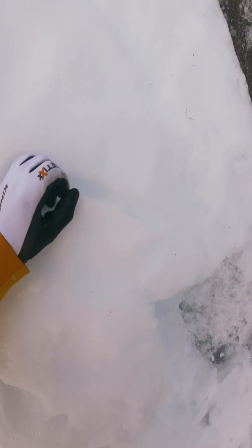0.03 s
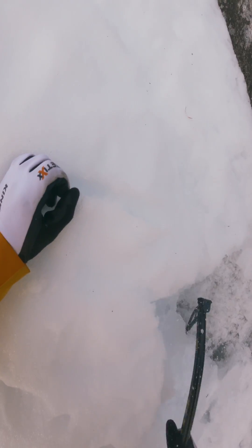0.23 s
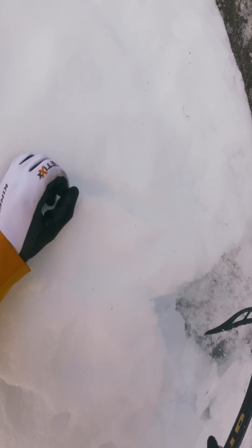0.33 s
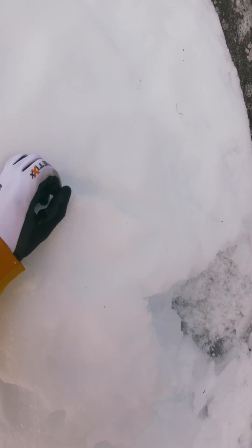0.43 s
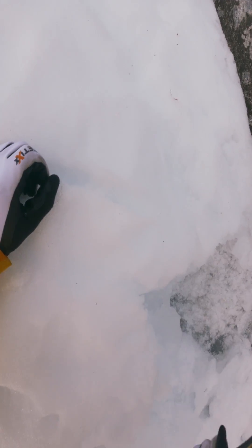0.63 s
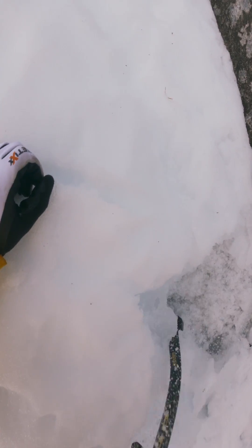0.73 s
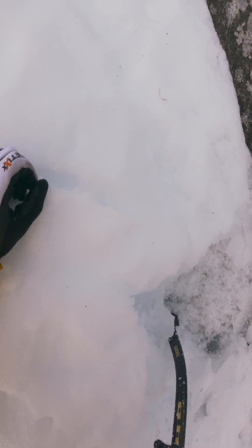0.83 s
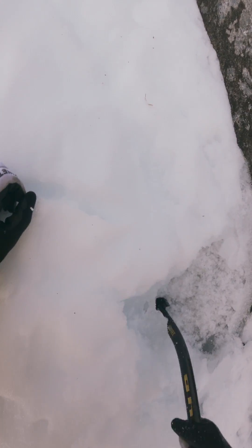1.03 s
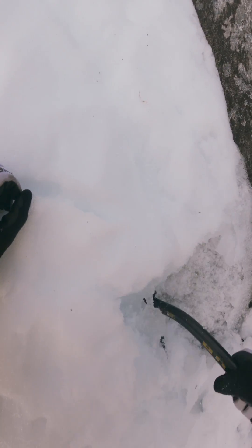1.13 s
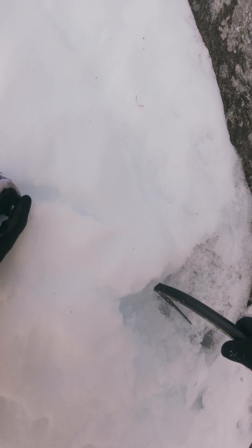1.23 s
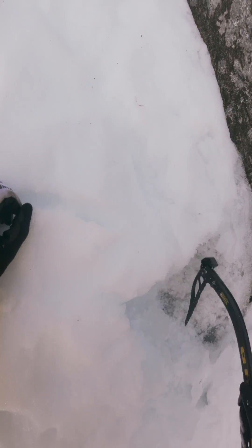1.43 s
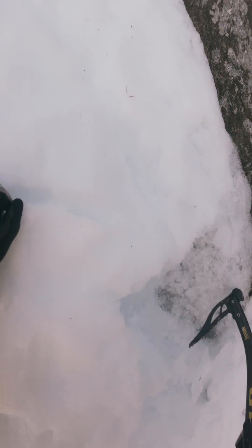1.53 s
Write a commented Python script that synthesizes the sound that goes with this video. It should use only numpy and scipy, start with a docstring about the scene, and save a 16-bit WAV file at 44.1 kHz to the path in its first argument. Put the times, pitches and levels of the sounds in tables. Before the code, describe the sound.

An ice axe hits hard snow twice, each blow a sharp crack with a dull thump. The pick crunches loose, squeaks once and rings faintly coming free. It is close by, in open mountain air with a faint hiss.

```python
"""Soft hiss and light gusts in open mountain air, no echo. A faint hiss swells, then at 0.2 s and 0.77 s
an ice axe is swung into hard snow at arm's length: each blow cracks the crust and thumps the packed snow.
The pick is then levered loose, crushing grains as it moves, and squeaks once near 1.17 s as steel slips
on ice. From 1.26 s it is dragged out of its hole and rings faintly as it comes free."""
import sys
import numpy as np
from scipy import signal
from scipy.fft import rfft, irfft
from scipy.io import wavfile
from scipy.ndimage import uniform_filter1d

SR = 44100
rng = np.random.default_rng(int(sys.argv[2]) if len(sys.argv) > 2 else 0)


def to_wav(sig):
    """Store sig (one row per channel, or 1-D mono) as 16-bit WAV at the path in sys.argv[1].

    Samples outside -1..1 are clipped; the rate is SR.
    """
    pcm = np.clip(np.atleast_2d(sig), -1, 1) * 32767
    pcm = np.round(pcm).astype(np.int16)
    wavfile.write(sys.argv[1], SR, pcm.T)  # frames by channels


N = 70560

# Spectra of slope hiss and of gusts. Each row: frequency in Hz, relative level in dB.
HISS_SPECTRUM = [(35, -50), (60, -27), (172, -6.5), (244, -9.5), (330, -3.5), (682, -19), (767, -12),
                 (1110, -9.5), (1740, -14.5), (12400, -25.5), (16000, -47)]
GUST_SPECTRUM = [(20, -12.5), (45, 7), (70, -5.5), (110, -4.5), (200, -9), (500, -46.5)]
# Their levels over time. Each row: time in seconds, level in dB.
HISS_LEVELS = [(0, -48), (.15, -50.5), (.42, -49), (.55, -52), (.59, -53.5), (.72, -50.5), (1.55, -49)]
GUST_LEVELS = [(0, -35), (.05, -50.5), (.17, -47), (.45, -60), (.555, -49), (.68, -57.5), (1.5, -56.5),
               (1.6, -49)]

# The first row is a faint hiss swelling just before the first blow; the rest are the pick crushing snow.
# Each row: start in seconds, length in seconds, grit level in dB, grit tilt in dB per octave,
# crunch level in dB, rumble level in dB, swell over the length in dB.
GRAIN_SPANS = [(0.188, 0.02, -39.5, -1, -48, -48, 9), (0.215, 0.012, -24, -3.5, -25.5, -19.5, 0),
               (0.226, 0.012, -28.5, 1.5, -23.5, -21.5, 7.5), (0.253, 0.012, -43, 2, -31, -26.5, -5),
               (0.277, 0.021, -48, 2, -43, -51, 8), (0.297, 0.015, -30.5, -4.5, -36, -63, 5),
               (0.321, 0.039, -43.5, 3.5, -46, -53, -9), (0.749, 0.017, -31, 1, -44, -43, 16),
               (0.8, 0.024, -42, 1, -43.5, -51, 1), (0.826, 0.025, -31, -8.5, -38, -31.5, 7),
               (0.855, 0.022, -30.5, -5.5, -51, -29, -3.5), (0.885, 0.04, -34, -1.5, -32.5, -59, 6.5),
               (0.934, 0.034, -42, -6.5, -41, -69, 1), (0.973, 0.026, -39.5, -2.5, -33, -44, -2.5),
               (1.003, 0.058, -31.5, -1.5, -25.5, -40, -6.5), (1.054, 0.035, -29, -3, -26, -27, 4.5),
               (1.091, 0.031, -26.5, -0.5, -21.5, -25, 4.5), (1.123, .04, -32, 1.5, -41, -46, -0.5),
               (1.165, 0.017, -27.5, -5.5, -30, -31.5, 5), (1.185, 0.02, -35, 2.5, -41, -34, -1),
               (1.207, 0.034, -33.5, 2, -41.5, -38, -2.5), (1.282, 0.023, -34.5, -1.5, -39, -61, -5),
               (1.309, 0.035, -39.5, 1, -36, -47, 9.5), (1.358, 0.087, -41, -3, -42, -57, -10.5),
               (1.419, 0.032, -37.5, -7.5, -38, -40, -1), (1.451, 0.059, -40, -0.5, -47.5, -50.5, 0)]
# Spectra of the grain layers. Each row: frequency in Hz, relative level in dB.
GRIT_SPECTRUM = [(400, -25), (1000, 3.5), (1600, -6), (2300, 3), (2600, -0.5), (3800, 4.5), (4250, 0.5),
                 (4700, -1), (6100, -1), (7600, -3), (8500, -13), (10800, -14.5), (12200, -12),
                 (15500, -48)]
CRUNCH_SPECTRUM = [(100, -0.5), (250, -6.5), (390, 5), (500, 2.5), (700, 2), (950, -3.5), (1300, -29),
                   (2500, -67)]
RUMBLE_SPECTRUM = [(20, -33), (50, -16), (80, 2.5), (140, -2.5), (260, -10), (450, -49), (1200, -64)]
# Resonances of the hollow around the pick, and of the axe damped by the snow that grips it.
# Each row: frequency in Hz, width in Hz, relative level in dB.
HOLLOW_MODES = [(281, 26, 0), (382, 7.8, -6), (403.8, 6.7, 10.5), (556, 30, -6.5), (646, 53, -11),
                (764, 17, -2.5), (915, 46, -1)]
GRIPPED_MODES = [(2320, 120, -7.5), (2990, 240, -7), (3416, 68, -2), (3873, 73, 1), (4210, 90, 3.5),
                 (5284, 130, -4), (6056, 210, 1.5), (6830, 160, -6.5), (7420, 160, -5.5)]

# Crust cracking. Each row: start in seconds, level in dB, decay in seconds, tilt in dB per octave.
CRACKS = [(0.2082, -10.5, 0.0039, 0), (0.2418, -16.5, 0.0038, -4), (0.7696, -9.5, 0.005, 2.5),
          (0.9987, -16, 0.0018, 2.5), (1.2546, -24, 0.0037, -2.5), (1.3347, -20, 0.0031, 5.5),
          (1.391, -22, .002, 5.5)]
# Spectra of the fracture and of the tip meeting ice. Each row: frequency in Hz, relative level in dB.
FRACTURE_SPECTRUM = [(150, -10), (500, -1), (1500, -0.5), (2700, -5.5), (4100, -1.5), (5100, -0.5),
                     (6150, -0.5), (6700, 1.5), (7500, -2), (8300, -7.5), (10500, -28), (12200, -13.5),
                     (15500, -55)]
TIP_SPECTRUM = [(2000, 3.5), (5000, 0), (8000, -8), (12300, -7), (16000, -31)]
# Packed snow thumping. Each row: start in seconds, level in dB, pitch in Hz, decay in seconds.
THUMPS = [(0.2101, -9.5, 370, 0.0029), (.2226, -4.5, 230, .006), (.2346, -3.5, 235, .0075),
          (.7738, -6, 160, .007), (.7822, -18, 235, .007), (.2435, -12, 670, 0.0043),
          (0.2615, -22, 463, 0.0035), (0.272, -27, 89, 0.0091), (.3128, -13.5, 643, 0.002),
          (0.7934, -16, 96, 0.008), (0.868, -32, 109, 0.011), (0.925, -29.5, 102, 0.011),
          (1.184, -25, 124, 0.0066), (1.216, -22, 158, 0.0061), (1.2578, -15, 700, 0.002),
          (1.2574, -23.5, 286, 0.0051), (1.263, -20.5, 104, 0.0065)]

# Pulses of the squeak. Each row: start in seconds, level in dB, decay in seconds.
SQUEAK_PULSES = [(1.167, -14.5, 0.0079), (1.175, -23.5, 0.011), (1.194, -20, 0.0055)]
# Resonances of the squeak and of the freed pick.
# Each row: frequency in Hz, width in Hz, relative level in dB.
SQUEAK_MODES = [(2050, 180, -11), (3100, 350, -4), (3570, 260, 47), (3870, 350, 0), (4150, 250, -4),
                (5700, 400, -13), (6200, 250, -13)]
FREE_MODES = [(2314, 27, -1), (3100, 65, -8.5), (3266, 67, -7), (4130, 26, -4.5), (5670, 250, -8),
              (6600, 190, -12), (7430, 390, -11)]
# Freed pick ringing. Each row: start in seconds, level in dB, decay in seconds, tilt in dB per octave.
RINGS = [(1.259, -37.5, 0.072, -4), (1.286, -35, 0.02, -18), (1.311, -30, 0.025, -9), (1.366, -42, 0.12, 1),
         (1.418, -35.5, .04, -2.5), (1.478, -30, 0.018, -8.5)]

# Stereo width of air and axe. Each row: frequency in Hz, side gain in dB.
AIR_SIDE = [(30, -1), (120, -19), (400, -12), (1000, -5.5), (4000, -3), (12000, -3)]
AXE_SIDE = [(60, -50), (250, -20.5), (500, -20.5), (1200, -8.5), (4000, -10), (9000, -8), (14000, -2.5)]
# Leftward lean of the axe. Each row: frequency in Hz, left minus right in dB.
AXE_BALANCE = [(200, 0.5), (500, 1), (1200, 3), (2500, 6), (5000, 2), (9000, 5.5)]

AIR_WAVER_PER_S, AIR_WAVER_DB = 41.9, 1.5
LOOSE_SNOW_PER_S, LOOSE_SNOW_DB = 98, -60
GRIT_PER_S, CRUNCH_PER_S, GRAIN_SPREAD_DB = 5000, 2200, 3
CRYSTALS_PER_S, CRYSTAL_DB = 150, 7.5
SPAN_ATTACK_S, SPAN_RELEASE_S = 0.0054, 0.0058
JERK_PER_S, JERK_DB = 200, 0.8
HOLLOW_DB, GRIT_RING_DB, CRACK_RING_DB = -3.5, -9.5, -5  # against the direct sound
TIP_DB, TIP_DECAY_S, CRACK_SIDE_DB = -8, 0.0017, -3.5
SLIP_HZ, SLIP_JITTER, SLIP_SPREAD_DB = 894, 0.3, 5
TIME_S = np.arange(N) / SR
FREQ_HZ = np.arange(N // 2 + 1) * SR / N + 1  # 1 Hz offset avoids zero
SIDE_SIGNS = np.array([[1], [-1]])


def undb(db):
    """Decibels to gain."""
    return 10 ** (np.asarray(db) / 20)


def unit(x):
    """Scale to rms 1."""
    return x / np.sqrt(np.mean(x ** 2))


def steady(x, span_s=0.008):
    """Hold the running rms at 1."""
    return x / np.sqrt(uniform_filter1d(x ** 2, int(span_s * SR)) + 1e-18)


def gains(spectrum):
    """Gain per frequency bin from (Hz, dB) rows."""
    hz, db = np.array(spectrum, float).T
    return undb(np.interp(np.log(FREQ_HZ), np.log(hz), db))


def colour(x, spectrum):
    """Filter by a spectrum."""
    return irfft(rfft(x) * gains(spectrum), N)


def resonate(x, modes):
    """Filter by parallel resonances."""
    response = sum(undb(db) / (1 + 1j * (FREQ_HZ ** 2 - hz ** 2) / (FREQ_HZ * width_hz))
                   for hz, width_hz, db in modes)
    return irfft(rfft(x) * response, N)


def tilted(rows, db_per_oct):
    """Tilt a spectrum or mode set about 1 kHz."""
    return [(*row[:-1], row[-1] + db_per_oct * np.log2(row[0] / 1000)) for row in rows]


def wander(per_s):
    """Smooth random curve, rms 1."""
    hold = int(SR / per_s)
    steps = np.repeat(rng.standard_normal(N // hold + 1), hold)[:N]
    return unit(uniform_filter1d(steps, hold))


def burst(start_s, decay_s, attack_s=0.00072):
    """Quick rise, exponential fall."""
    age_s = np.maximum(TIME_S - start_s, 0)
    return (1 - np.exp(-age_s / attack_s)) * np.exp(-age_s / decay_s)


def grains(per_s):
    """Random clicks, a few much larger than the rest."""
    size = undb(GRAIN_SPREAD_DB * np.minimum(rng.exponential(size=N), 5))
    return (rng.random(N) < per_s / SR) * size * rng.choice([-1, 1], N)


def mountain_air():
    """Faint ticks of loose snow, hiss of the open slope and light gusts, in stereo."""
    out = undb(LOOSE_SNOW_DB) * unit(colour(grains(LOOSE_SNOW_PER_S), GRIT_SPECTRUM))
    for spectrum, levels in ((HISS_SPECTRUM, HISS_LEVELS), (GUST_SPECTRUM, GUST_LEVELS)):
        mid, side = (unit(colour(rng.standard_normal(N), spectrum)) for _ in range(2))
        db = np.interp(TIME_S, *np.array(levels).T) + AIR_WAVER_DB * wander(AIR_WAVER_PER_S)
        out = out + undb(db) * (mid + colour(side, AIR_SIDE) * SIDE_SIGNS)
    return out


def hiss_and_crushing():
    """A faint hiss swells before the first blow; after it the pick snaps snow grains in jerks."""
    fine = grains(GRIT_PER_S) + undb(CRYSTAL_DB) * grains(CRYSTALS_PER_S)
    coarse = grains(CRUNCH_PER_S)
    hollow = undb(HOLLOW_DB) * unit(resonate(coarse, HOLLOW_MODES))
    crunch = steady(unit(colour(coarse, CRUNCH_SPECTRUM)) + hollow, span_s=0.0118)
    rumble = steady(colour(grains(CRUNCH_PER_S), RUMBLE_SPECTRUM), span_s=0.019)
    out = 0
    for start_s, length_s, grit_db, db_per_oct, crunch_db, rumble_db, swell_db in GRAIN_SPANS:
        age_s = TIME_S - start_s
        attack = np.clip(age_s / SPAN_ATTACK_S, 0, 1)
        release = np.exp(-np.maximum(age_s - length_s, 0) / SPAN_RELEASE_S)
        swell = undb(swell_db * (np.clip(age_s / length_s, 0, 1) - 0.5))
        direct = unit(colour(fine, tilted(GRIT_SPECTRUM, db_per_oct)))
        steel = unit(resonate(fine, tilted(GRIPPED_MODES, db_per_oct)))
        grit = steady(direct + undb(GRIT_RING_DB) * steel, span_s=0.03)
        layers = undb(grit_db) * grit + undb(crunch_db) * crunch + undb(rumble_db) * rumble
        out = out + attack * release * swell * layers
    return out * undb(JERK_DB * wander(JERK_PER_S))


def crust_cracks():
    """The tip ticks on ice; milliseconds of dense fracture leave the steel ringing."""
    out = 0
    for start_s, db, decay_s, db_per_oct in CRACKS:
        noise = rng.standard_normal(N)
        envelope = burst(start_s, decay_s)
        fracture = envelope * steady(colour(noise, tilted(FRACTURE_SPECTRUM, db_per_oct)), span_s=0.0018)
        modes = tilted(GRIPPED_MODES, db_per_oct)
        steel = resonate(noise * envelope, modes) / np.std(resonate(noise, modes))
        tip_noise = steady(colour(rng.standard_normal(N), TIP_SPECTRUM), span_s=0.0024)
        tip = burst(start_s, TIP_DECAY_S) * tip_noise
        out = out + undb(db) * (fracture + undb(CRACK_RING_DB) * steel + undb(TIP_DB) * tip)
    return out


def snow_thumps():
    """The pack is pushed in and swings for a cycle or two."""
    return sum(undb(db) * burst(start_s, decay_s) * np.sin(2 * np.pi * hz * (TIME_S - start_s))
               for start_s, db, hz, decay_s in THUMPS)


def ice_squeak():
    """The wedged steel sticks and slips unevenly on ice."""
    cycles = np.cumsum(SLIP_HZ * np.exp(SLIP_JITTER * wander(SLIP_HZ))) / SR
    slips = np.diff(np.floor(cycles), prepend=0)  # one click per cycle
    slips *= undb(SLIP_SPREAD_DB * rng.standard_normal(N))
    envelope = sum(undb(db) * burst(start_s, decay_s) for start_s, db, decay_s in SQUEAK_PULSES)
    return envelope * steady(resonate(slips, SQUEAK_MODES))


def pick_rings():
    """Grains brush the freed pick and ring its steel modes."""
    out = 0
    for start_s, db, decay_s, db_per_oct in RINGS:
        steel = steady(resonate(grains(GRIT_PER_S), tilted(FREE_MODES, db_per_oct)), span_s=0.032)
        out = out + undb(db) * burst(start_s, decay_s, attack_s=0.0013) * steel
    return out


def textures():
    """Swelling hiss, crushing, squeak and rings."""
    return hiss_and_crushing() + ice_squeak() + pick_rings()


def scene():
    """The axe a little to the left, in open air."""
    lean = gains(AXE_BALANCE)
    pan = 2 * np.array([lean, np.ones_like(lean)]) / (1 + lean)
    axe = irfft(rfft(crust_cracks() + snow_thumps() + textures()) * pan, N)
    # Fresh noise makes the treble partly different at each ear.
    side = colour(undb(CRACK_SIDE_DB) * crust_cracks() + textures(), AXE_SIDE)
    return axe + side * SIDE_SIGNS + mountain_air()


def record(dry, low_hz=35, top_hz=15600):
    """Thin the deepest bass, clip at 0.9, cut the top."""
    highpass = signal.butter(2, low_hz, "high", fs=SR, output="sos")
    lowpass = signal.ellip(8, 0.2, 80, top_hz, fs=SR, output="sos")
    clipped = np.clip(signal.sosfilt(highpass, dry), -0.9, 0.9)
    return signal.sosfilt(lowpass, clipped)


dry = scene()
out = record(dry)
to_wav(out)
```